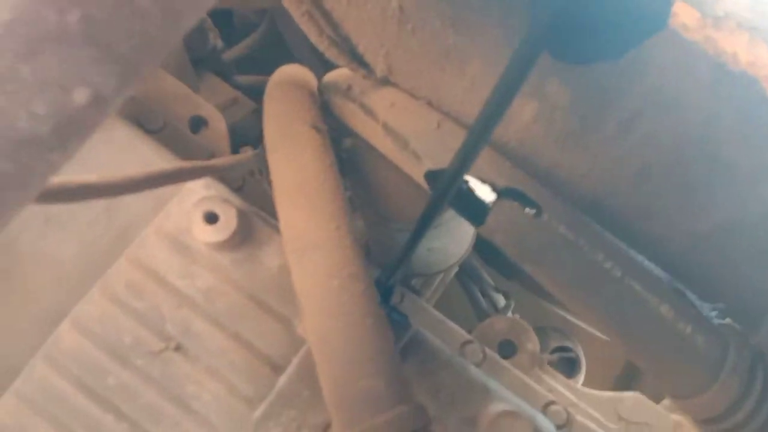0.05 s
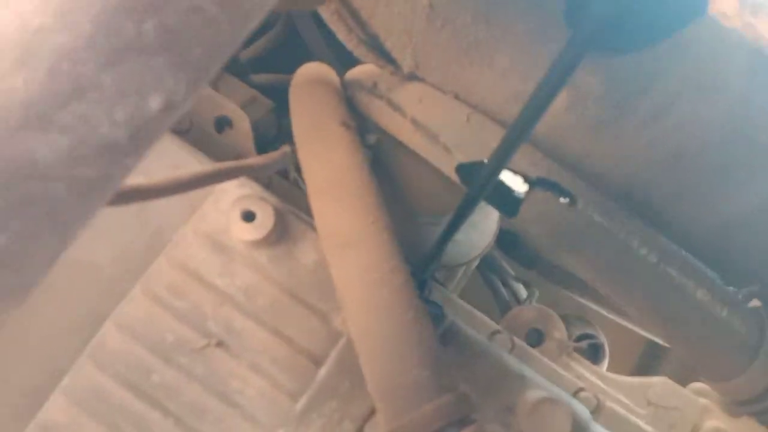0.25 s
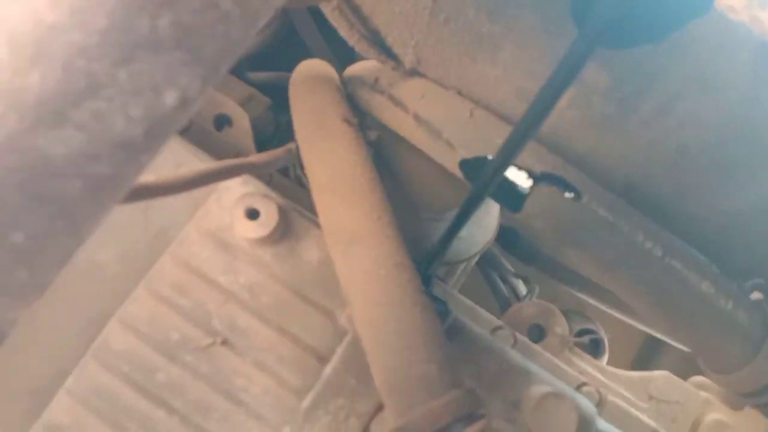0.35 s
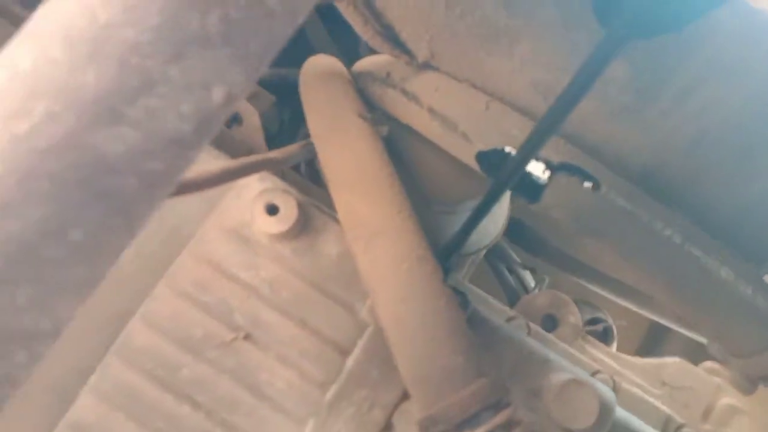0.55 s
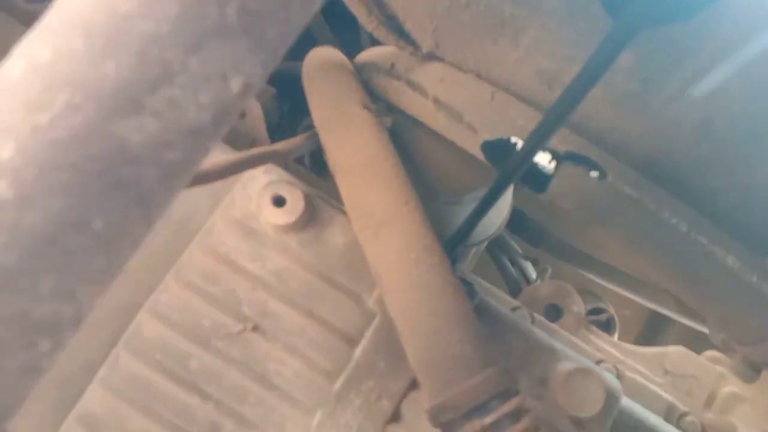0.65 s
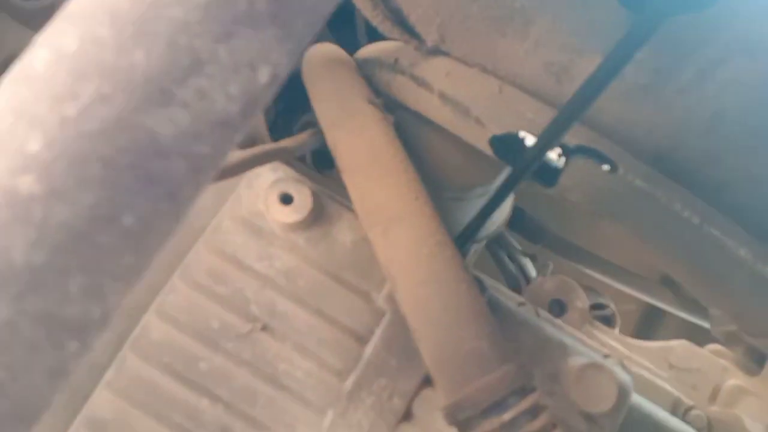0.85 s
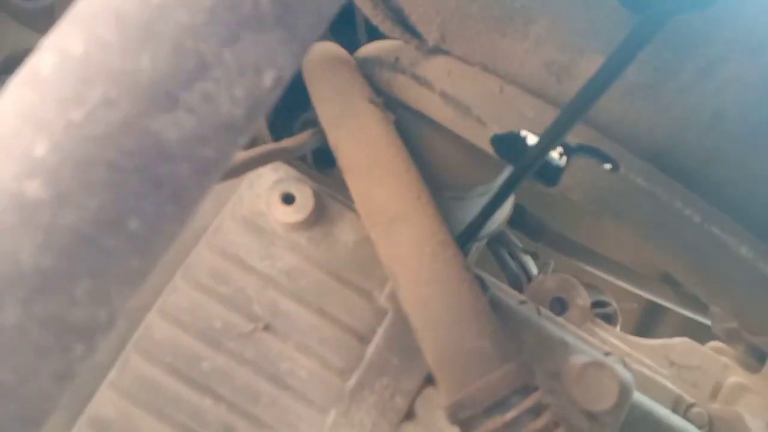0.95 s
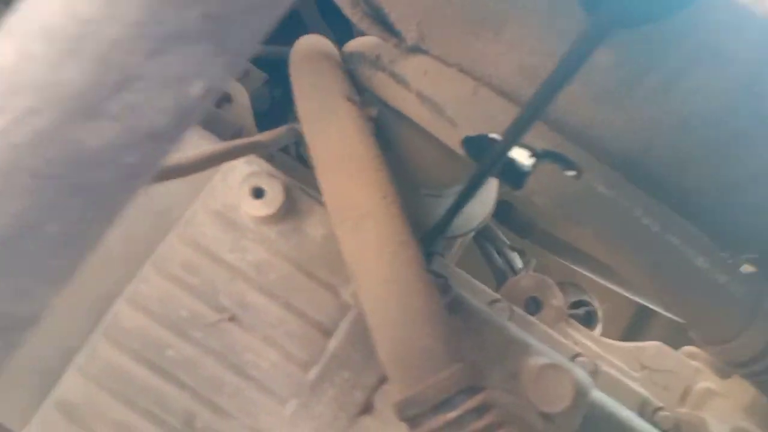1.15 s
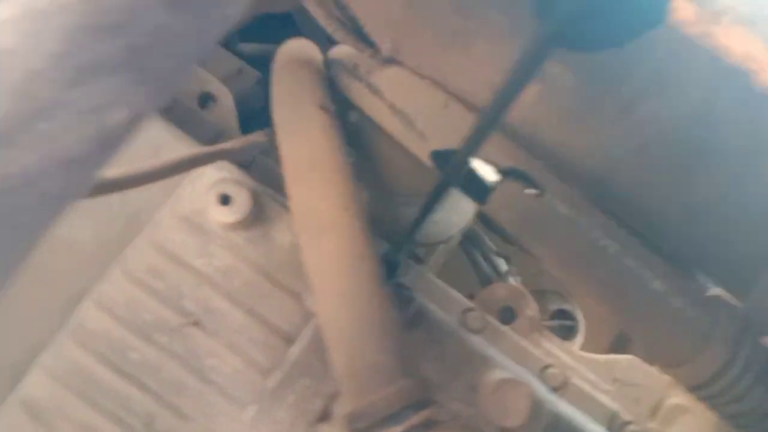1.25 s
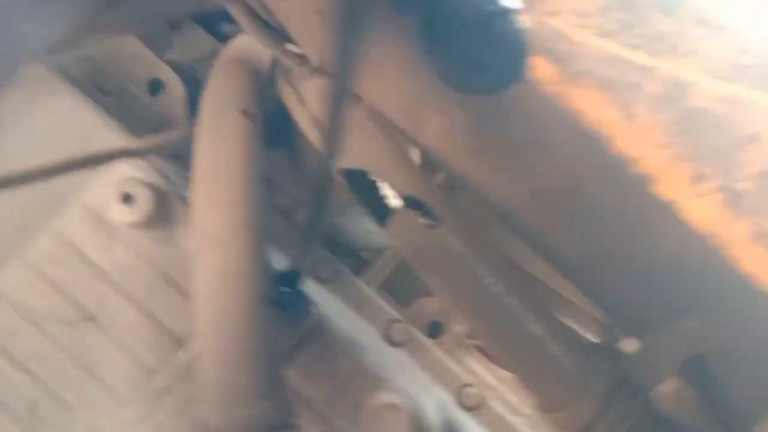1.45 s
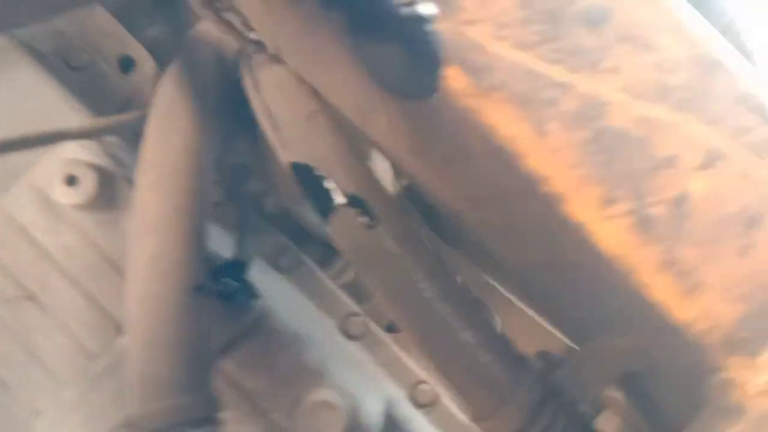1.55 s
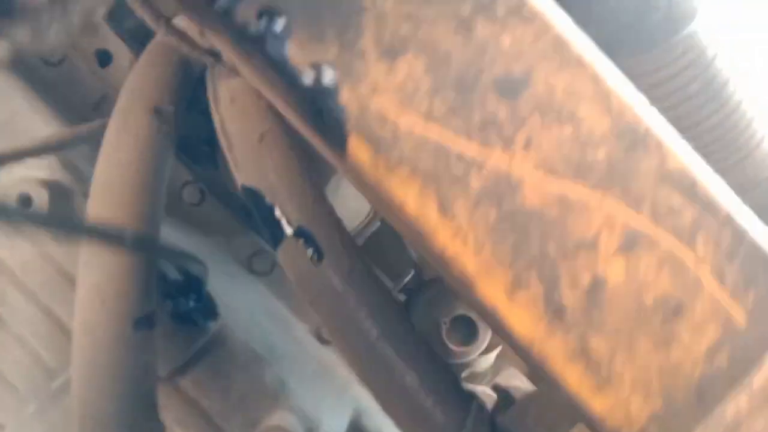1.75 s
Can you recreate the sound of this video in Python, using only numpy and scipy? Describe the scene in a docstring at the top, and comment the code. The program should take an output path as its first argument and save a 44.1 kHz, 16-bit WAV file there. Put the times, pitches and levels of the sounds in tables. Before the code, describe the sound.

Thick oil splatters into a hollow plastic drum, close and outdoors: a faint knock, a sudden glug, a second of uneven wet splats over crackling bubbles, then a soft thump, few drips and a thin squeak.

```python
"""Thick oil spurts from an engine into a plastic drum, outdoors and close by.
A small hollow knock leads into a second of irregular splats over a crackling stream of bubble grains.
Hollow resonances and a short diffuse echo colour the oil; damped tones make the knock and later glugs.
The flow stops with a soft thump and a few last drips. Shaped noise makes the air, rustle and swish;
wavering sines make a thin squeak and a fainter whine."""
import sys
import numpy as np
from scipy import signal
from scipy.fft import rfft, irfft, next_fast_len
from scipy.io import wavfile
from scipy.ndimage import map_coordinates

SR = 44100
rng = np.random.default_rng(int(sys.argv[2]) if len(sys.argv) > 2 else 0)


def generate_wav(signal):
    """Clip the signal to [-1, 1] and save it as 16-bit WAV at the path in sys.argv[1]."""
    frames = np.transpose(np.atleast_2d(signal))
    scaled = np.clip(frames, -1, 1) * 32767
    pcm = np.round(scaled).astype(np.int16)
    wavfile.write(sys.argv[1], SR, pcm)


N = 79380  # samples, 1.8 s
TOP_HZ = 15800  # upper limit of the bubble pitches and of the whole mix


def amp(db):
    """Decibels to linear gain."""
    return 10 ** (np.asarray(db) / 20)


def unit(x):
    """Scale to rms 1."""
    return x / np.sqrt(np.mean(x ** 2) + 1e-20)


def along(points, hz):
    """Read a colour table, interpolating on a log frequency axis."""
    f, v = np.transpose(points)
    return np.interp(np.log(hz + 1), np.log(f + 1), v)


def curve(rows):
    """Draw a (time, level) table as one value per sample."""
    return np.interp(np.arange(N) / SR, *np.transpose(rows))


def wobble(rate):
    """A smooth random curve with rate knots a second."""
    knots = rng.standard_normal(4096)
    return map_coordinates(knots, [np.arange(N) * rate / SR], mode="wrap")


def filtered(x, response):
    """Multiply the spectrum of x by a response given as a function of frequency."""
    m = 2 * next_fast_len(len(x))
    hz = np.fft.rfftfreq(m, 1 / SR)
    return irfft(rfft(x, m) * response(hz), m)[:len(x)]


def causal(gain):
    """Minimum-phase response with this gain: it rings only after the blow."""
    cepstrum = irfft(np.log(gain))
    half = len(cepstrum) // 2
    cepstrum[1:half] *= 2
    cepstrum[half + 1:] = 0
    return np.exp(rfft(cepstrum))


def noise(colour):
    """Coloured noise of rms 1."""
    return unit(filtered(rng.standard_normal(N), lambda hz: amp(along(colour, hz))))


TREBLE_HZ = 3495  # the shelf reaches half its dB here


def brighten(x, treble_db):
    """Treble shelf; negative values dull the sound."""
    return filtered(x, lambda hz: amp(treble_db * hz ** 4 / (hz ** 4 + TREBLE_HZ ** 4)))


BELL_OCTAVES = 0.24  # standard deviation of the bell


def hump(hz, centre_hz):
    """A bell on a log frequency axis, 1 at its centre."""
    return np.exp(-(np.log2((hz + 1) / centre_hz) / BELL_OCTAVES) ** 2 / 2)


def add(out, s, x):
    """Mix x into out at time s, in seconds."""
    part = out[max(round(s * SR), 0):][:len(x)]
    part += x[:len(part)]


# Outdoor air, relative colour: f/Hz, level/dB
AIR_COLOUR = [(25, -24), (70, -6.5), (130, 0.5), (250, -9), (500, -16.5), (2000, -19.5), (9000, -42.5)]
AIR_DB = -71.5


def air():
    """Quiet outdoor air: steady noise, strongest in the bass."""
    return amp(AIR_DB) * noise(AIR_COLOUR)


# Faint rustle, swelling at the end: t/s, level/dB
RUSTLE_LEVEL = [(1.2, -78), (1.62, -79.5), (1.67, -66), (1.8, -57.5)]
# Rustle, relative colour: f/Hz, level/dB
RUSTLE_TONE = [(100, -24), (950, -16), (1260, 0.5), (1480, -11), (1800, 3), (3300, -4.5), (4400, -15.5),
               (7000, -17), (8500, -27)]


def rustle():
    """Faint rustle: coloured noise riding a level curve."""
    return amp(curve(RUSTLE_LEVEL)) * noise(RUSTLE_TONE)


TONE_WAVER = 0.017  # pitch waver, as a fraction of the pitch


def thin_tone(hz):
    """A sine of rms 1 that wavers in pitch and pulses in level."""
    wavering_hz = hz * (1 + TONE_WAVER * wobble(170))
    tone = np.sin(2 * np.pi * np.cumsum(wavering_hz) / SR)
    return unit(tone * amp(3 * wobble(60)))


WHINE_HZ, WHINE_DB = 1246, -78


def whine():
    """A faint lingering tone, wavering throughout."""
    return amp(WHINE_DB) * thin_tone(WHINE_HZ)


# Thin squeak, in two main swells: t/s, level/dB
SQUEAK_LEVEL = [(1.28, -89), (1.33, -74.5), (1.48, -80.5), (1.53, -61.5), (1.58, -73), (1.63, -68.5),
                (1.67, -87.5)]
SQUEAK_HZ = 2035


def squeak():
    """A thin wavering tone riding a level curve."""
    return amp(curve(SQUEAK_LEVEL)) * thin_tone(SQUEAK_HZ)


GRAIN_CYCLES = 1.47  # cycles for a tiny bubble to fall to 1/e


def spray(rate):
    """Tiny bursting bubbles, each with its own moment, pitch and size; even in spectrum, rms 1."""
    t = np.arange(256) / SR
    when, pitch, size, sign = rng.random((int(rate * N / SR), 4)).T[:, :, None]
    hz = 200 * (TOP_HZ / 200) ** pitch
    strength = hz * np.sqrt(-np.log(1 - size)) * np.sign(sign - .5)
    grains = strength * np.exp(-hz * t / GRAIN_CYCLES) * np.sin(2 * np.pi * hz * t)
    index = (when * N).astype(int) + np.arange(len(t))
    return unit(np.bincount(index.ravel(), grains.ravel(), N)[:N])


# Broad colour, relative; a small rise near 15 kHz rides on top: f/Hz, level/dB
BROAD_COLOUR = [(30, -42.5), (120, -24), (230, -21), (310, -8.5), (430, -11), (540, -15.5), (690, -11),
                (980, -12.5), (1150, -4.5), (1600, -5.5), (1800, -9), (2050, -7.5), (2750, -15.5),
                (3050, -12.5), (4300, -19.5), (5600, -22), (7300, -29.5), (8100, -38), (10000, -36.5),
                (13500, -53), (15000, -41)]
# Drum's hollow resonances: f/Hz, width/Hz, level/dB over the broad colour
DRUM_MODES = [(318.4, 23, -1), (332.3, 23, 3), (676, 46, -4.5), (905.6, 20, 4.5), (1119.5, 25, 0),
              (1261.8, 15, 6), (1290, 89, -2.5), (1580, 30, -8.5), (1648, 25, -7), (2488, 37, -5),
              (5580, 110, -3.5)]


def drum(hz):
    """A broad colour with the drum's hollow resonances on top, evened to rms 1."""
    ring = 1
    for centre, width, db in DRUM_MODES:
        ring = ring + amp(db) * 1j * hz * width / (centre ** 2 - hz ** 2 + 1j * hz * width)
    response = causal(amp(along(BROAD_COLOUR, hz))) * ring
    return response / np.sqrt(np.mean(abs(response) ** 2))


BODY_HZ = 850  # where the body of the oil sound sits
STREAM_GRAINS_PER_S, STREAM_FLUTTER_DB, FLUTTER_PER_S = 10000, 1.8, 150
FIZZ_DB, THIN_FIZZ = -2.5, .2  # fizz at full flow; dB more for each dB that the stream thins
STREAM_BODY_DB = -3.5  # the stream is thinner than the blobs around BODY_HZ
STREAM_RING_HZ, STREAM_RING_DB, STREAM_RING_SWING_DB = 1274, -1, 2.5  # main ring, in flares
# Running stream, before the drum: t/s, level/dB
STREAM_LEVEL = [(0, -49), (.11, -65), (.23, -33), (.29, -31), (.32, -37.5), (.39, -32), (.46, -41.5),
                (.498, -45), (.54, -27), (.62, -34), (.69, -36.5), (.72, -42.5), (.85, -31.5), (.94, -34),
                (1.02, -36), (1.06, -34), (1.095, -46), (1.17, -51.5), (1.26, -53), (1.315, -75),
                (1.8, -91.5)]


def stream():
    """The unsteady stream patters on the drum and flares its main ring; it fizzes more as it thins."""
    level_db = curve(STREAM_LEVEL)
    flutter = amp(STREAM_FLUTTER_DB * wobble(FLUTTER_PER_S))
    patter = unit(flutter * spray(STREAM_GRAINS_PER_S)) * amp(level_db)
    body = brighten(patter, treble_db=-14.5)
    thinning_db = level_db.max() - level_db
    fizz_db = FIZZ_DB + THIN_FIZZ * thinning_db + STREAM_FLUTTER_DB * wobble(FLUTTER_PER_S)
    fizz = amp(fizz_db) * (patter - body)
    flares = unit(amp(STREAM_RING_SWING_DB * wobble(20)) * rng.standard_normal(N))
    flares *= amp(level_db + STREAM_RING_DB)
    ring = filtered(flares, lambda hz: hump(hz, STREAM_RING_HZ) ** 10)  # power narrows the bell
    return filtered(body + fizz + ring, lambda hz: drum(hz) * amp(STREAM_BODY_DB * hump(hz, BODY_HZ)))


SOFT_ATTACK_S = 0.0015  # onset of low tones and thumps
LOW_TONE_WAVER = 0.033  # pitch waver, as a fraction of the pitch
# Hollow knock at the start, then glugs:
# t/s, f/Hz, level/dB (sine amplitude is doubled), decay to -60 dB/s
LOW_TONES = [(.007, 387, -38, 0.1), (.009, 299, -44.5, 0.12), (.009, 588, -50, 0.08),
             (.012, 932, -62.5, 0.6), (.268, 678, -27.5, 0.1145), (1.056, 342, -28, 0.07),
             (1.055, 1093, -18.5, 0.0055)]


def low_tones():
    """Hollow knock at the start, then glugs: soft, wavering damped tones."""
    out, t = np.zeros(N), np.arange(SR // 4) / SR
    for s, hz, db, t60 in LOW_TONES:
        wavering_hz = hz * (1 + LOW_TONE_WAVER * wobble(250)[:len(t)])
        tone = 2 * np.sin(2 * np.pi * np.cumsum(wavering_hz) / SR)
        add(out, s, tone * amp(db - 60 * t / t60) * (1 - np.exp(-t / SOFT_ATTACK_S)))
    return out


SPLAT_DB, SPLAT_GRAINS_PER_S = -2, 22000  # trim on every blob; bubble density
SPLAT_ATTACK_S, SPLAT_T60_S = .001, .043  # for the loudest blob; weaker ones are shorter
SHORTER_DB = 59  # a blob this much weaker dies twice as fast
BODY_PER_DB = 0.66  # dB of bass lost for each dB weaker, from 11 dB under the loudest
POCKET_DB, POCKET_PER_DB = 4.5, 0.15  # air pocket's peak for the loudest; dB more for each dB weaker
# Oil landing in the drum: t/s, level/dB before trim, f/Hz of its air pocket, treble/dB
BLOBS = [(.014, -38.5, 4300, 9), (.068, -41, 2320, 3), (0.135, -39, 6560, 5), (.150, -35, 6350, 1.5),
         (.187, -34.5, 6360, -0.5), (0.219, -27, 2006, 4), (.236, -20, 3080, 3), (.267, -14, 704, -0.5),
         (.271, -12.5, 1100, -7.5), (0.296, -25, 880, 2.5), (.353, -17, 1100, 0), (.371, -20.5, 697, -0.5),
         (.380, -19.5, 694, -4.5), (.399, -20.5, 1750, 6.5), (0.429, -23.5, 3490, 3.5),
         (0.503, -23.5, 1150, -2), (.521, -22, 1770, -1.5), (.536, -21.5, 1000, 5), (.543, -17.5, 2520, -4),
         (.551, -15.5, 2500, 2), (.559, -19.5, 1220, 1), (.590, -24.5, 1350, 5.5), (.654, -21.5, 1340, -17),
         (.669, -24, 6270, -4), (.682, -18.5, 1400, 0.5), (.733, -28.5, 3100, -3),
         (.771, -22.5, 1350, -6.5), (.782, -23, 1980, -7.5), (.803, -27, 2000, 3), (.837, -18.5, 1560, 3.5),
         (.845, -19, 1550, -3.5), (.876, -20.5, 2167, -1), (.898, -27.5, 4400, 5), (0.917, -19, 1350, 1.5),
         (.928, -16.5, 1350, -4), (.937, -22, 4400, 5), (.945, -26, 1350, 3), (.959, -21, 1336, -2),
         (.992, -26, 1972, -8), (1.036, -17, 6300, 3.5), (1.049, -26.5, 1000, 5.5),
         (1.055, -18, 1012, -9.5), (1.07, -26.5, 6310, 4), (1.072, -25.5, 2200, 8.5),
         (1.108, -40.5, 3100, 4.5), (1.178, -30.5, 1340, 4), (1.244, -34, 1960, 0), (1.285, -48, 2150, -10),
         (1.386, -53.5, 3060, 2), (1.469, -64, 5500, 4), (1.537, -55.5, 2000, -0.5)]


def splats():
    """Blobs burst into short sprays through an air pocket: big ones fuller, small ones clearer in pitch."""
    out, t = np.zeros(N), np.arange(4096) / SR
    bubbles = spray(SPLAT_GRAINS_PER_S)
    loudest_db = max(row[1] for row in BLOBS)
    for s, db, pocket_hz, treble_db in BLOBS:
        size = 2 ** ((db - loudest_db) / SHORTER_DB)
        attack = 1 - np.exp(-t / (size * SPLAT_ATTACK_S))
        shape = attack * amp(-60 * t / (size * SPLAT_T60_S))
        body_db = BODY_PER_DB * min(db - loudest_db + 11, 0)
        pocket_db = POCKET_DB + POCKET_PER_DB * (loudest_db - db)

        def blob_colour(hz):
            """Body shelf plus the peak of the air pocket."""
            return amp(body_db / (1 + (hz / BODY_HZ) ** 4) + pocket_db * hump(hz, pocket_hz))

        burst = shape * bubbles[rng.integers(N - len(t)):][:len(t)]
        hit = filtered(burst, lambda hz: drum(hz) * causal(blob_colour(hz)))
        hit *= np.linalg.norm(shape) / shape.max() / np.linalg.norm(hit)  # energy of its peak-1 envelope
        add(out, s, amp(db + SPLAT_DB) * brighten(hit, treble_db))
    return out


ECHO_DB, ECHO_T60_S = -14.5, .1


def echo(x):
    """A short diffuse tail from the drum's walls: convolution with decaying noise."""
    t = np.arange(SR // 4) / SR
    tail = rng.standard_normal(len(t)) * amp(-60 * t / ECHO_T60_S)
    return amp(ECHO_DB) * signal.fftconvolve(x, tail / np.linalg.norm(tail))[:N]


# Soft bumps: t/s, f/Hz (half the low-pass corner), level/dB, decay to -60 dB/s
BUMPS = [(.269, 120, -39, .05), (1.108, 100, -44, .07)]


def thumps():
    """Each soft bump is one dull, quickly dying puff of low-passed noise."""
    out, t = np.zeros(N), np.arange(SR // 4) / SR
    for s, dull_hz, db, t60 in BUMPS:
        puff = unit(filtered(rng.standard_normal(len(t)), lambda hz: 1 / (1 + (hz / dull_hz / 2) ** 4)))
        add(out, s, puff * amp(db - 60 * t / t60) * (1 - np.exp(-t / SOFT_ATTACK_S)))
    return out


SWISH_S, SWISH_LENGTH_S, SWISH_HZ, SWISH_DB = 1.3, 0.027, 2910, -62.5  # centre time, half-length


def swish():
    """One soft brush: a band of noise swelling and fading as a bell in time."""
    band = unit(filtered(rng.standard_normal(N), lambda hz: hump(hz, SWISH_HZ)))
    swell = np.exp(-((np.arange(N) / SR - SWISH_S) / SWISH_LENGTH_S) ** 2)
    return amp(SWISH_DB) * band * swell


def scene():
    """Oil with its echo, over the bumps and the quiet surroundings."""
    background = air() + rustle() + whine() + squeak() + swish()
    oil = stream() + low_tones() + splats()
    return (oil + echo(oil) + thumps() + background)[None]


def record(dry):
    """Band limit: nothing passes above TOP_HZ."""
    return np.array([filtered(x, lambda hz: hz < TOP_HZ) for x in dry])


dry = scene()
out = record(dry)
generate_wav(out)
```